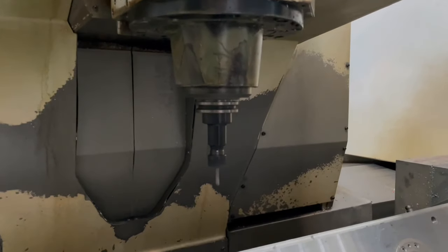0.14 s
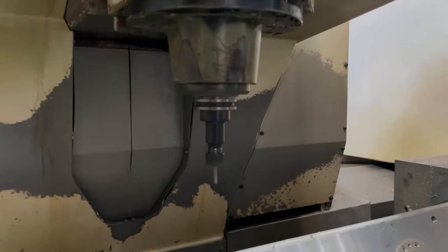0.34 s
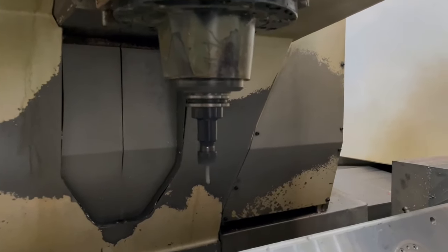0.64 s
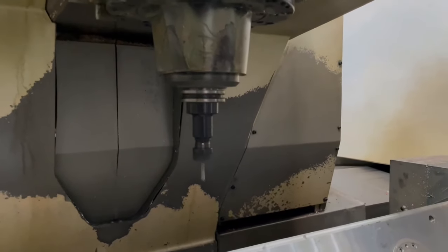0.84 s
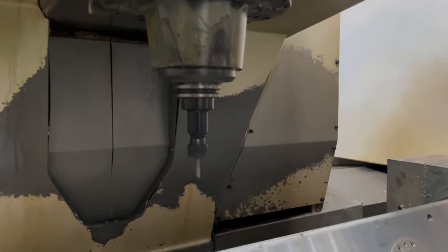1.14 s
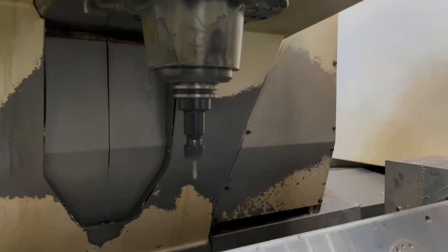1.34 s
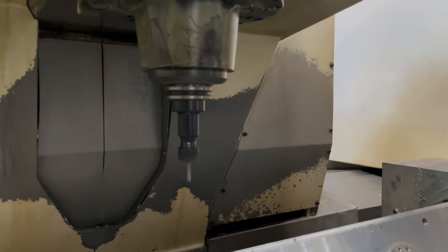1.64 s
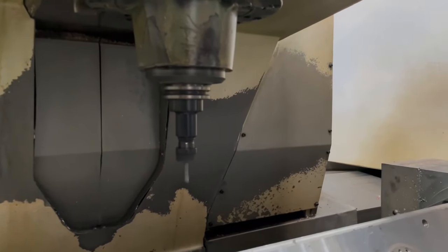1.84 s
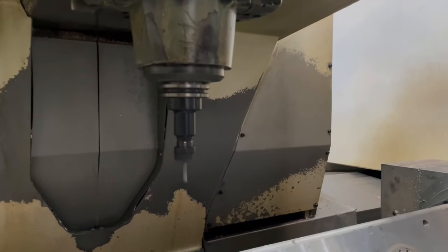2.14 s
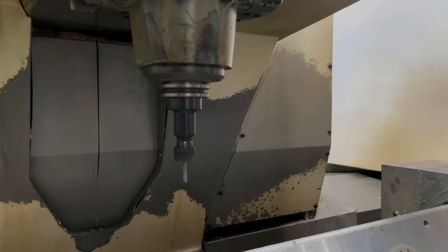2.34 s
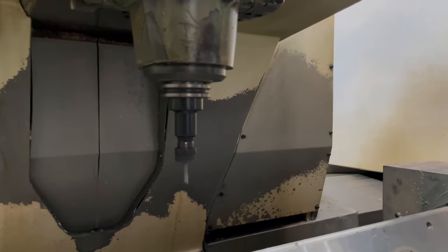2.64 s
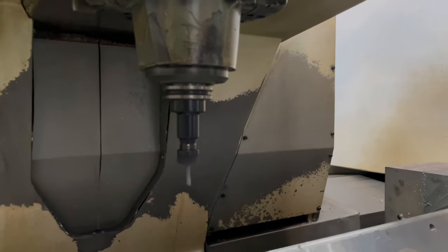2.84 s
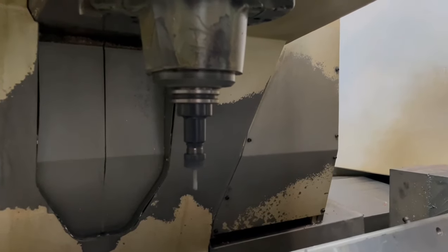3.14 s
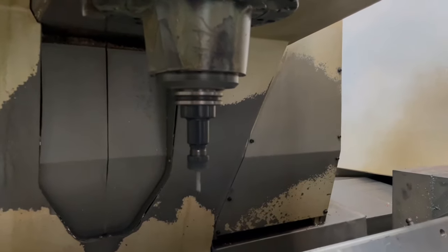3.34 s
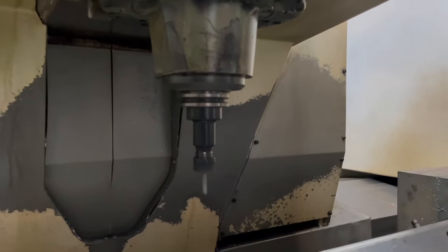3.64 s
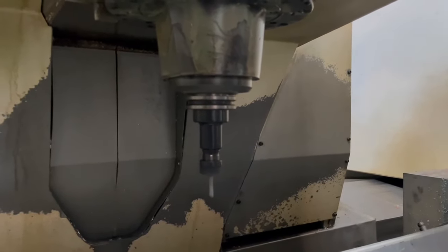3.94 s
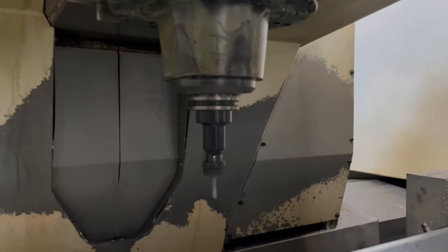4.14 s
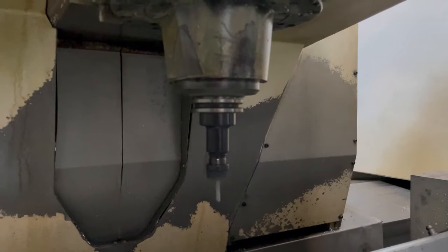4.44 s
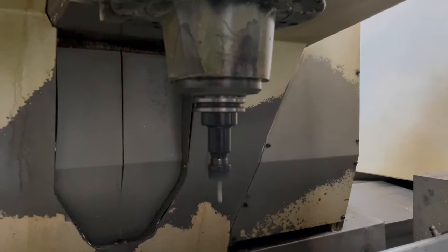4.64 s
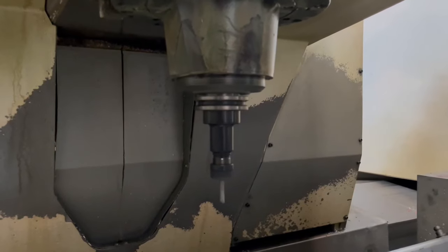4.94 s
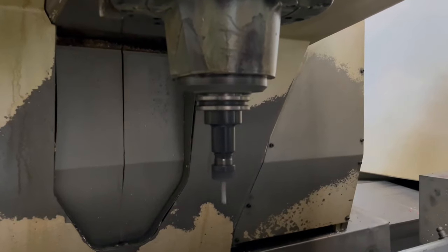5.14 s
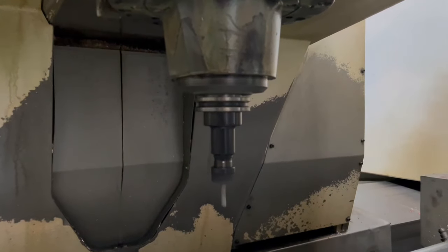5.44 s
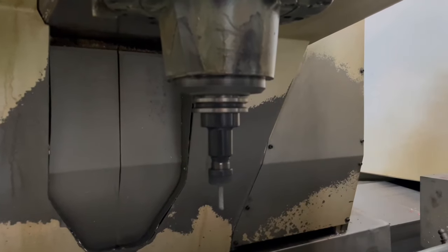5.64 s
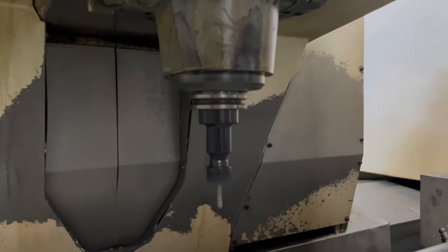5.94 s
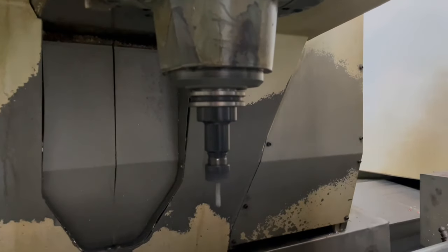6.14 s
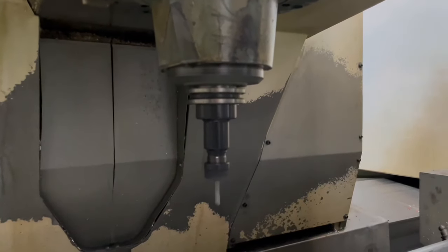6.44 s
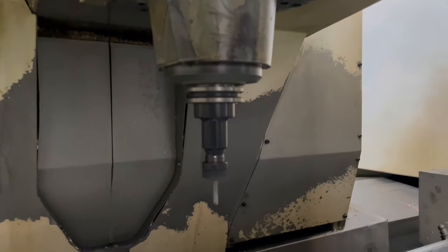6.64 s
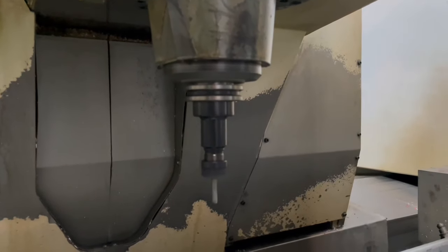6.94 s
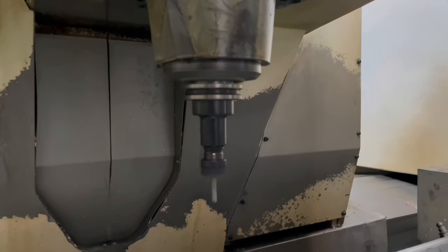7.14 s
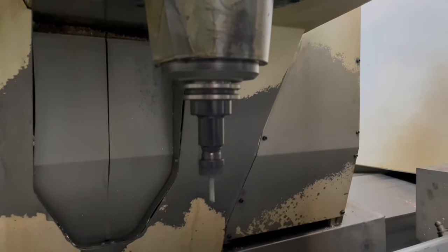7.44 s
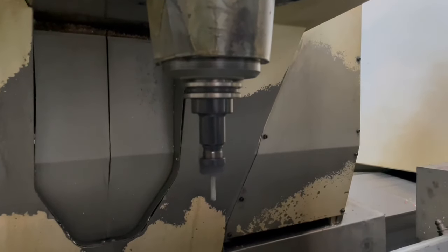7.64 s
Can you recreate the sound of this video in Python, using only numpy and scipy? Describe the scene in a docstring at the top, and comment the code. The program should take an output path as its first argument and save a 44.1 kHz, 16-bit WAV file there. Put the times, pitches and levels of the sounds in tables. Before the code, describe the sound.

From the start, a machining spindle turns freely in its steel enclosure, making a thin, very high whine of several tones. Individual tones swell and fade as the hand-held microphone drifts. Underneath are a low, quickly pulsing pump and electrical hum, workshop rumble, faint mid-pitched panel tones and a soft hiss of air. At about 2.8 seconds the spindle accelerates sharply: the pitch sweeps upward with a short, throbbing rasp, and the panels ring briefly. By 3 seconds it has settled at the higher speed. The whine is now more widely spread and a little stronger, bearings sing in the middle range, and a low shaft drone builds until about 4 seconds. The highest hiss drops away around 1 and 4 seconds. The spindle keeps this speed until the end, near 8 seconds, its high tones still trading prominence.

```python
"""A thin, many-toned whine that steps up near 3 s: a machining spindle turning freely in its steel
enclosure, from 2500 to 4000 rev/min. Its inverter makes the motor whine in tone clusters, which spread
with speed and swell and fade as the hand-held microphone drifts through standing waves. The unbalanced
shaft drones, bearings sing, panels ring, a pump beats against mains hum; rumble and air lie behind."""
import sys
import numpy as np
from scipy import signal
from scipy.fft import rfft, irfft, next_fast_len
from scipy.io import wavfile

SR = 44100
rng = np.random.default_rng(int(sys.argv[2]) if len(sys.argv) > 2 else 0)


def materialize(psi):
    """Save the field psi as 16-bit PCM at rate SR to the path in sys.argv[1].

    A 1-D psi becomes a single channel; in a 2-D psi each row is a channel.
    """
    bounded = np.clip(np.atleast_2d(psi).T, -1, 1)
    quanta = np.round(bounded * 32767).astype(np.int16)
    wavfile.write(sys.argv[1], SR, quanta)


N = 343980
TIME = np.arange(N) / SR
CARRIER_HZ, POLE_PAIRS = 3200, 2


def from_db(db):
    """Decibels to gain."""
    return 10 ** (np.asarray(db) / 20)


def in_time(rows):
    """Each column of a curve at every sample."""
    t, *columns = np.transpose(rows)
    return [np.interp(TIME, t, column) for column in columns]


def coloured(gain_at):
    """Noise with amplitude gain_at(f) per root Hz."""
    size = next_fast_len(N)
    hz = np.maximum(np.arange(size // 2 + 1) * SR / size, 1)
    return irfft(rfft(rng.standard_normal(size)) * gain_at(hz), size)[:N] * np.sqrt(SR / 2)


def drift(rate_hz, hop=100):
    """Slow random motion, unit spread: coarse noise through a double one-pole low-pass."""
    pole, count = np.exp(-2 * np.pi * rate_hz * hop / SR), N // hop + 2
    slow = signal.lfilter([1], [1, -2 * pole, pole * pole], rng.standard_normal(2 * count))[count:]
    return np.interp(np.arange(N) / hop, np.arange(count), (slow - slow.mean()) / slow.std())


def stereo(mid, side):
    """Mid and side to left and right."""
    return np.array([mid + side, mid - side])


def tone(cycles, mid_db, side_db, lean):
    """Sine reaching the two microphone ports with different strength and delay."""
    angle, lag = 2 * np.pi * cycles, np.arccos(lean)
    return np.sqrt(2) * stereo(from_db(mid_db) * np.cos(angle), from_db(side_db) * np.cos(angle + lag))


def ringing(modes, side_db):
    """Randomly shaken resonances, each at its own rms level."""
    def gain_at(f):
        return np.sqrt(sum(from_db(2 * db) * 2 / (np.pi * width) / (1 + ((f - hz) / width) ** 2) ** 2
                           for hz, width, db in modes))
    return stereo(coloured(gain_at), from_db(side_db) * coloured(gain_at))


def rush(spectrum, floor_db=-200):
    """Steady noise from mid and side spectra, silent beyond their ends."""
    hz, mid_db, side_db = np.transpose(spectrum)
    def noise(db):
        return coloured(lambda f: from_db(np.interp(np.log(f), np.log(hz), db, floor_db, floor_db)))
    return stereo(noise(mid_db), noise(side_db))


# Inner tones, {tone: level/dB}; "3c-5" = 3 x carrier - 5 x supply frequency
INNER_DB = {"1c-3": -64, "1c-1": -70, "1c+1": -70, "1c+3": -66, "1c+5": -70, "2c-4": -60, "2c-2": -55,
            "2c+0": -54, "2c+2": -55, "2c+4": -58, "3c-5": -48, "3c-3": -51, "3c-1": -52, "3c+1": -56,
            "3c+3": -49, "3c+5": -50}
# Motor housing resonances: f/Hz, width/Hz, level/dB at full speed
HOUSING_MODES = [(2800, 200, -59), (3350, 160, -63), (3835, 380, -51), (5720, 330, -58.5),
                 (7250, 400, -47.5), (7950, 350, -54), (8450, 500, -57), (10780, 520, -53.5),
                 (11950, 250, -68)]
# Standing-wave crests: t/s, tone, level/dB, swell/s
CRESTS = [(0.4, "2c-2", -44, .2), (1.0, "2c-2", -50, .15), (1.5, "2c-2", -47, .2), (2.45, "2c-2", -46, .38),
          (3.2, "2c-2", -50, .4), (4.4, "2c-2", -43.7, .6), (6.1, "2c-2", -47.5, .6), (7.2, "2c-2", -52, 1),
          (2.4, "2c+0", -51, .8), (4.5, "2c+0", -51, .5), (7.1, "2c+0", -52, .7),
          (0.35, "2c+2", -44.5, .26), (1.3, "2c+2", -42.5, .6), (2.45, "2c+2", -39, .55),
          (3.35, "2c+2", -51, .25), (4.35, "2c+2", -48, .3), (5.5, "2c+2", -46.5, .32),
          (6.75, "2c+2", -44, .4), (7.5, "2c+2", -43.5, .6), (4.15, "2c+4", -43.5, 1.25),
          (7.2, "2c+4", -47, .9), (3.3, "2c+6", -42, .75), (5.2, "2c+6", -45.5, .5),
          (7.1, "2c+6", -41.7, 1.2), (3.2, "2c+8", -42.5, .55), (0.9, "3c-5", -33.2, 1),
          (1.95, "3c-5", -40, .5), (6.5, "3c-5", -32.7, 1.1), (7.7, "3c-5", -34.5, .9),
          (5.0, "3c-3", -36.5, .85), (0.22, "3c-1", -32, .42), (1.95, "3c-1", -35.5, .5),
          (2.65, "3c-1", -39.5, .3), (4.0, "3c-1", -33.5, .55), (5.6, "3c-1", -38.5, .9),
          (7.3, "3c-1", -38.5, 1.2), (0.0, "3c+1", -35, .35), (1.5, "3c+1", -46, .35),
          (4.1, "3c+1", -47, .35), (5.25, "3c+1", -38.5, .7), (7.1, "3c+1", -44.5, 1.3),
          (2.55, "3c+3", -43, .4), (4.2, "3c+3", -49, .7), (2.2, "3c+5", -44.5, .88)]

def sideband_db(name, hz, fast, t, skirt_growth_db=19):
    """Power sum for one tone: inner share, housing-coloured skirt, standing-wave crests."""
    inner = from_db(INNER_DB.get(name, -np.inf))
    housing = np.sqrt(sum((from_db(db) / (1 + ((hz - centre) / width) ** 2) ** 2) ** 2
                          for centre, width, db in HOUSING_MODES))
    skirt = housing * from_db(-skirt_growth_db * (1 - fast ** 3))
    parts = [inner, skirt]
    for crest_s, which, db, swell_s in CRESTS:
        if which == name:
            same_pitch = 1 - abs(fast - np.interp(crest_s, t, fast))   # no crest at the other speed
            parts.append(from_db(db) * np.exp(-((t - crest_s) / swell_s) ** 2) * same_pitch)
    return 10 * np.log10(sum(part ** 2 for part in parts))


# Inverter clusters, {carrier multiple: offsets in supply multiples}
SIDEBANDS = {1: range(-3, 8, 2), 2: range(-6, 17, 2), 3: range(-11, 12, 2), 4: range(-8, -5, 2)}
# Throb at the supply frequency, {carrier multiple: depth}
RIPPLE_DEPTH = {1: .08, 2: .1, 3: .04}
# Microphone port response: f/Hz, side minus mid/dB, leftward lean (-1..1)
PORTS = [(2800, -1, -0.14), (3820, -5, 0.14), (5900, 0, .3), (6250, 0, .3), (6620, -4.5, .3), (7200, 1, .4),
         (7470, 9, .4), (8000, 9, .2), (8400, 16, 0), (8670, 6, -.2), (9000, 11, -0.31), (9500, 9, -0.13),
         (10000, 8, -.1), (10800, 2, -.1), (12000, -8, -0.075)]

def inverter_whine(speed_hz, turns, fast, hop=100):
    """Switching tones at carrier multiples plus or minus multiples of the motor's supply frequency."""
    out, t = np.zeros((2, N)), TIME[::hop]
    port_hz, port_side_db, port_lean = np.transpose(PORTS)
    supply = np.cos(2 * np.pi * POLE_PAIRS * turns)
    sway_s = 4e-6 * drift(3.6)   # the moving microphone shifts the travel time
    growth_db = {1: .5 * fast * (TIME - 5.2)}
    flicker_db = {2: .7 * drift(23), 3: 4 * (np.minimum(drift(16), .3) + .15)}   # mid only
    for multiple, offsets in SIDEBANDS.items():
        ripple = 1 + RIPPLE_DEPTH.get(multiple, 0) * supply
        for offset in offsets:
            hz = multiple * CARRIER_HZ + offset * POLE_PAIRS * speed_hz[::hop]
            cycles = multiple * CARRIER_HZ * (TIME + sway_s) + offset * POLE_PAIRS * turns + rng.random()
            total_db = sideband_db("%dc%+d" % (multiple, offset), hz, fast[::hop], t)
            apart_db = np.interp(hz, port_hz, port_side_db)
            lean = np.interp(hz, port_hz, port_lean)
            mid_db = total_db - 10 * np.log10(1 + from_db(apart_db) ** 2)
            mid_db, side_db, lean = in_time(np.transpose([t, mid_db, mid_db + apart_db, lean]))
            wander_db = .4 * drift(.29)
            tremor_db = .25 * multiple * drift(30)   # shorter waves react more to a trembling hand
            shimmer_db = .7 * drift(30)
            gain = ripple * from_db(growth_db.get(multiple, 0) + wander_db + tremor_db + shimmer_db)
            out += gain * tone(cycles, mid_db + flicker_db.get(multiple, 0), side_db, lean)
    return out


# Rasp bands: f/Hz, width/Hz, level/dB at full torque
RASP_BANDS = [(680, 300, -44.5), (6900, 450, -44.5), (8050, 400, -51), (9450, 400, -47)]

def motor(speed_hz, turns, fast, torque, growl_depth=.54):
    """Under torque the whine gives way to a rasp throbbing at the supply frequency."""
    whine = inverter_whine(speed_hz, turns, fast) * from_db(-4.5 * torque)
    throb = 1 + growl_depth * np.cos(2 * np.pi * POLE_PAIRS * turns)
    return whine + torque * throb * ringing(RASP_BANDS, side_db=-3)


# Drone envelope: t/s, level/dB
DRONE_LEVEL = [(0, -67), (2.8, -62), (3.0, -44), (3.3, -42.5), (3.85, -39), (7.8, -38.5)]

def shaft_drone(turns):
    """Unbalance, one cycle per turn, building as the column takes up the shaking."""
    level_db, = in_time(DRONE_LEVEL)
    return from_db(level_db) * np.sqrt(2) * np.cos(2 * np.pi * turns)


# Bearing tones, parallel lists: multiple of the turning rate; mid, side level/dB at full speed
BEARING_ORDERS = [4, 5, 6, 8, 9.47, 10.37, 12, 12.21, 12.297, 13, 13.3, 13.715, 15.7, 17.251, 18.15, 19.25,
                  72.5, 73.8]
BEARING_MID_DB = [-59, -61.5, -59.5, -70, -66.5, -65, -54, -63.5, -46, -65, -65, -57, -62.5, -49.5, -67,
                  -63.5, -67, -68]
BEARING_SIDE_DB = [-99, -75, -70, -72, -78, -72, -72, -67, -50, -66, -65, -68, -66, -52.5, -68, -66, -77,
                   -69]

def bearings(turns, speed_share, torque, loaded_order=12.297, slip_turns=.0006):
    """Unevenly rolling balls sing, far louder at speed; torque lifts the main tone, ducks the rest."""
    out = np.zeros((2, N))
    for order, mid_db, side_db in zip(BEARING_ORDERS, BEARING_MID_DB, BEARING_SIDE_DB):
        cycles = order * (turns + slip_turns * drift(3.4)) + rng.random()
        strain_db = torque * (5 if order == loaded_order else -6)
        out += from_db(strain_db + .64 * drift(12)) * tone(cycles, mid_db, side_db, lean=.59)
    return out * speed_share ** 6.3


# Panel rings in the run-up: peak t/s, f/Hz, level/dB, swell/s
PANEL_RINGS = [(2.8, 800, -51, .025), (2.865, 642, -45, .025), (2.87, 1008, -48, .03),
               (2.875, 402, -43.5, .03), (2.92, 228, -43, .025), (2.945, 402, -43.5, .03),
               (2.972, 810, -40, .018), (2.98, 690, -48, .025)]

def panel_rings():
    """Enclosure panels ring briefly, timed to the rising tones sweeping past."""
    rings = []
    for peak_s, hz, db, swell_s in PANEL_RINGS:
        t = TIME - peak_s
        swell = np.exp(-np.minimum((t / swell_s) ** 2, 20))
        rings.append(swell * tone(hz * t, db, db - 18, lean=.37))
    return sum(rings)


# Low-speed panel resonances: f/Hz, width/Hz, level/dB
IDLE_MODES = [(870, 22, -58.5), (1057, 29, -57), (1511, 25, -65), (1900, 66, -65.5), (2520, 34, -63),
              (4130, 140, -62.5), (4900, 90, -71)]

def idle_panels():
    """Steel panels ring faintly in narrow noise bands."""
    return ringing(IDLE_MODES, side_db=-4)


# Low-speed tones: f/Hz, level/dB before trim
IDLE_TONES = [(414.5, -58), (640.6, -60), (807.5, -57), (904.4, -64), (1001, -59), (1200, -66),
              (6900, -55.5), (7350, -58.5)]

def idle_tones(trim_db=-1):
    """Faint, slightly wavering tones: a few mid-pitched ones and two thin, high whines."""
    return sum(from_db(trim_db + 2 * drift(1.7)) * tone(hz * TIME + .1 * drift(.74), db, db - 3, lean=.4)
               for hz, db in IDLE_TONES)


# Mains, pump and cooling fan, parallel lists: f/Hz; mid, side level/dB
HUM_HZ = [43, 85.97, 100.054, 107.477, 128.97]
HUM_MID_DB = [-75, -49.5, -44, -44, -50]
HUM_SIDE_DB = [-90, -79, -63.5, -63.5, -75]

def hum(in_phase_s=.057):
    """The pump runs just above the mains hum; the two beat at about 7 Hz."""
    return sum(tone(hz * (TIME - in_phase_s), mid_db, side_db, lean=.89)
               for hz, mid_db, side_db in zip(HUM_HZ, HUM_MID_DB, HUM_SIDE_DB))


# Rumble spectrum: f/Hz, mid, side density/dB (1 Hz band)
RUMBLE_SPECTRUM = [(20, -87, -105), (45, -68.5, -104), (72.5, -66.5, -87), (122, -62.5, -79),
                   (154.5, -72.5, -101), (217, -66, -90), (288, -75.5, -82), (440, -74.5, -82.5),
                   (734, -78, -77.5), (1130, -79.5, -80.5), (1346, -84, -83), (2070, -88.5, -88.5),
                   (3970, -105, -105)]

def rumble(swell_db):
    """Workshop and enclosure rumble, fluttering slightly."""
    return from_db(swell_db + 1.05 * drift(18)) * rush(RUMBLE_SPECTRUM)


# Spindle nose and air seal spectra: f/Hz, mid, side density/dB (1 Hz band)
NOSE_HISS = [(1200, -100, -100), (2000, -88, -91), (2800, -85.5, -92), (3700, -89, -95), (4150, -92, -99),
             (4950, -87, -94), (5330, -88.5, -95), (5500, -96, -101), (5850, -92, -94), (6700, -89, -91),
             (7300, -89, -90), (7700, -98, -98), (8600, -103, -99), (9200, -99, -96), (10200, -99, -98)]
SEAL_SIZZLE = [(6600, -112, -96), (7200, -102, -81), (7600, -100, -76.5), (8150, -94, -73.5),
               (8800, -104, -76), (9300, -102, -82), (10400, -104, -90)]

def purge_air(nose_db, seal_db):
    """Air hisses round the spindle nose and sizzles at the seal."""
    nose = from_db(nose_db + .5 * drift(14)) * rush(NOSE_HISS)
    seal = from_db(seal_db + .89 * drift(6)) * rush(SEAL_SIZZLE)
    return nose + seal


# Top treble spectrum: f/Hz, mid, side density/dB (1 Hz band)
TOP_SPECTRUM = [(9000, -102, -102), (9900, -95, -94), (10700, -89, -88), (11240, -87.5, -89),
                (11600, -91, -93), (11800, -98, -104), (12250, -105, -115)]
# Top treble envelope: t/s, gain/dB
TOP_GAIN = [(0, 2), (.55, 6.5), (.75, -18), (1.2, -36), (1.45, 5.5), (2.8, 3), (3.0, 6), (3.55, 5),
            (3.9, -35), (4.4, -23), (4.8, 2.5), (7.8, 6.5)]

def top_treble():
    """The highest treble flickers and drops out twice."""
    gain_db, = in_time(TOP_GAIN)
    return from_db(gain_db + 7 * np.minimum(drift(22), .5)) * rush(TOP_SPECTRUM)


# Spindle speed: t/s, turning rate/Hz
SPEED = [(0, 41.667), (2.795, 41.667), (2.86, 53.5), (2.915, 66), (2.95, 67.6), (2.985, 66.667),
         (7.8, 66.667)]
# Motor torque: t/s, share of full torque
TORQUE = [(0, 0.099), (2.77, 0), (2.81, 0.13), (2.87, 0.84), (2.975, 0.47), (3.02, 0.0039), (7.8, 0)]
# Background swells: t/s, rumble, nose hiss, seal sizzle gain/dB
SWELLS = [(0, 0, 0, 2), (.5, 0, .5, 2), (1, 0.5, 0.5, -6), (2.9, 0.5, 1, 2.5), (3.3, -0.5, 2.2, -1.5),
          (4.6, -0.1, 2, -3), (5.4, 0.4, 2.5, -10), (7.8, 0.5, 2.5, 0)]

def scene():
    """Speed and torque drive the spindle; hum, rumble and air run throughout."""
    speed_hz, = in_time(SPEED)
    torque, = in_time(TORQUE)
    rumble_db, nose_db, seal_db = in_time(SWELLS)
    turns = np.cumsum(speed_hz) / SR
    low_hz, high_hz = speed_hz[0], speed_hz[-1]
    fast = np.clip((speed_hz - low_hz) / (high_hz - low_hz), 0, 1)
    spindle = shaft_drone(turns) + bearings(turns, speed_hz / high_hz, torque)
    idle = (1 - fast) * (idle_panels() + idle_tones())
    balance = from_db([[.6], [-.6]])   # left, right
    background = balance * (rumble(rumble_db) + purge_air(nose_db, seal_db) + top_treble())
    return motor(speed_hz, turns, fast, torque) + spindle + panel_rings() + idle + hum() + background


def record(dry):
    """Steep elliptic low-pass at 12.3 kHz."""
    return signal.sosfilt(signal.ellip(12, .1, 90, 12300, fs=SR, output="sos"), dry)


dry = scene()
out = record(dry)
materialize(out)
```